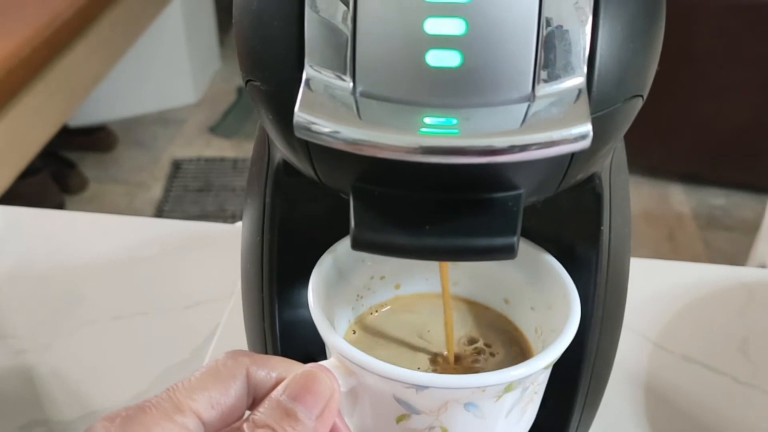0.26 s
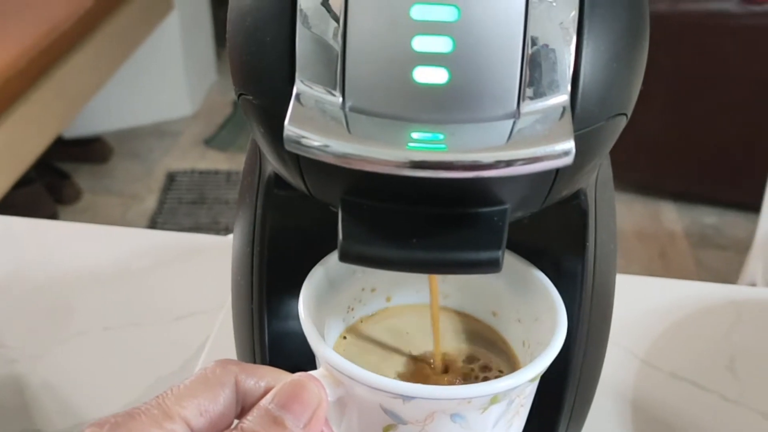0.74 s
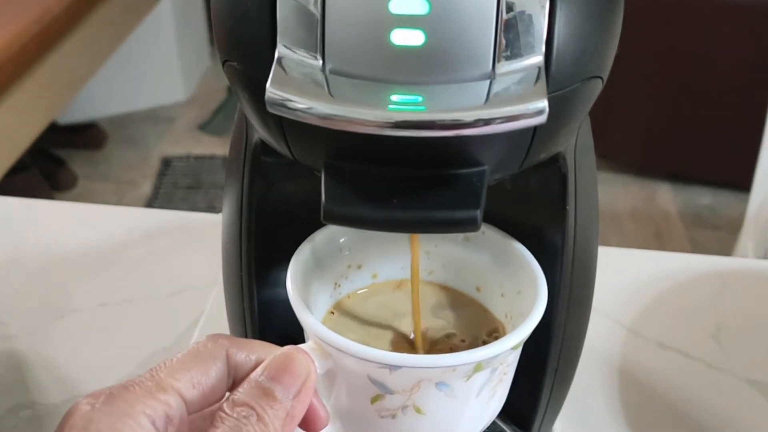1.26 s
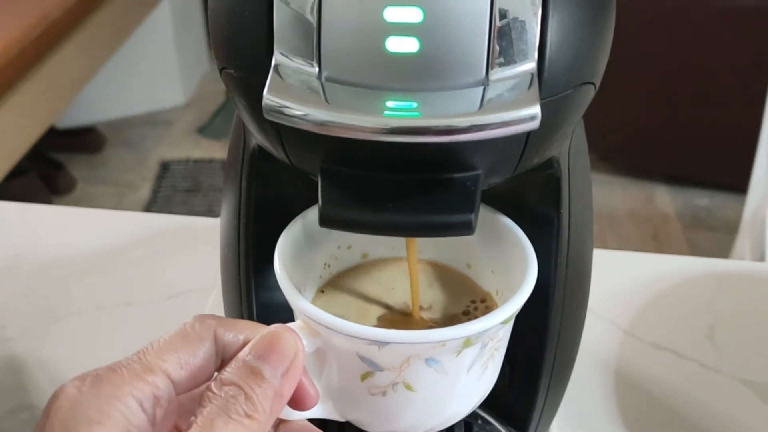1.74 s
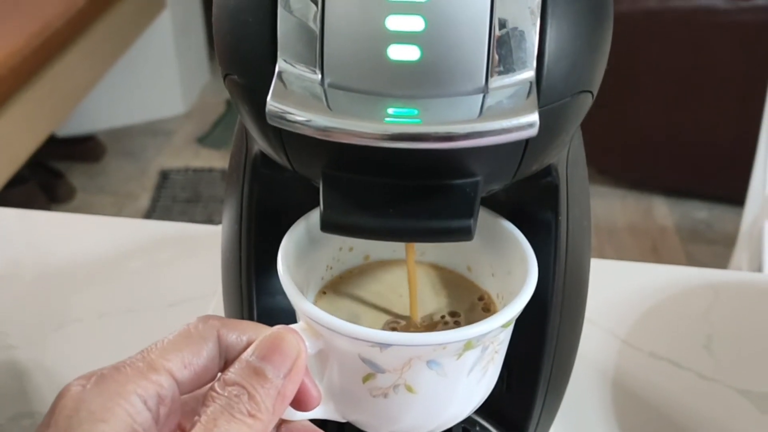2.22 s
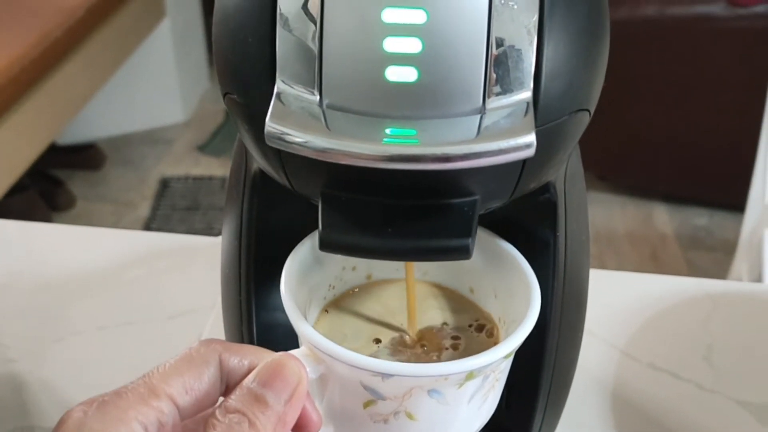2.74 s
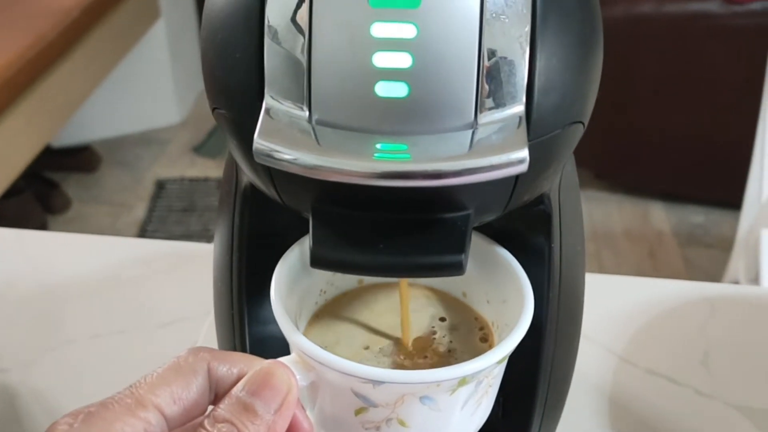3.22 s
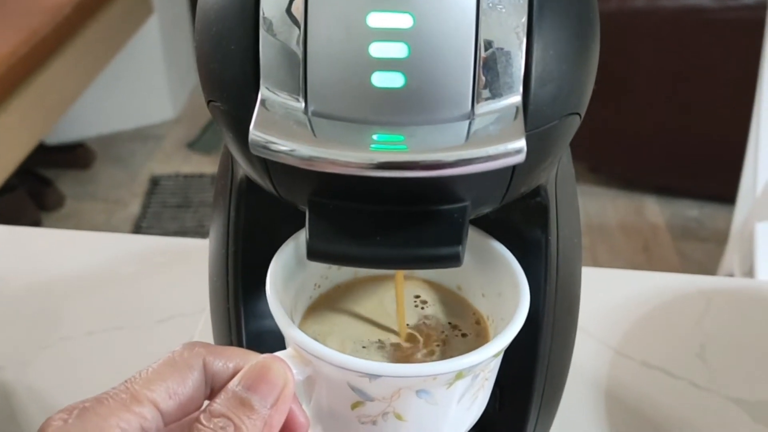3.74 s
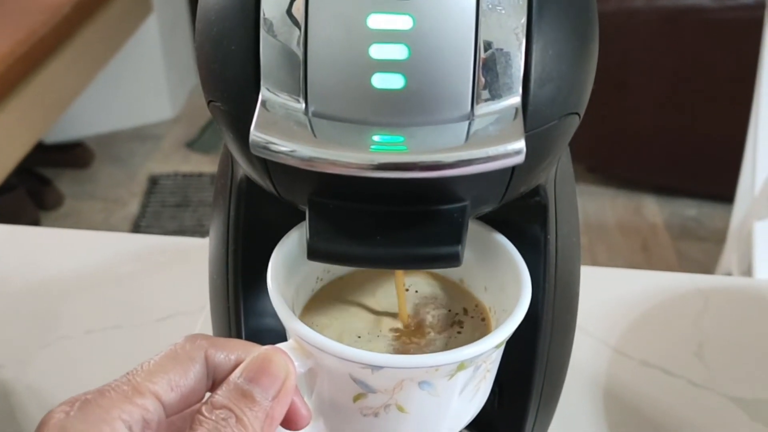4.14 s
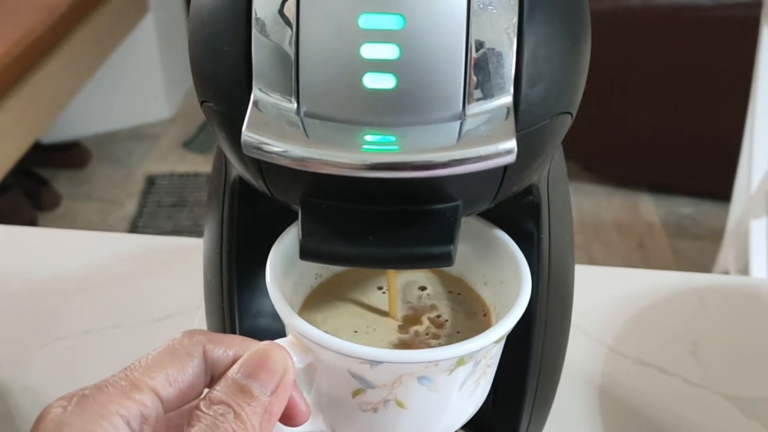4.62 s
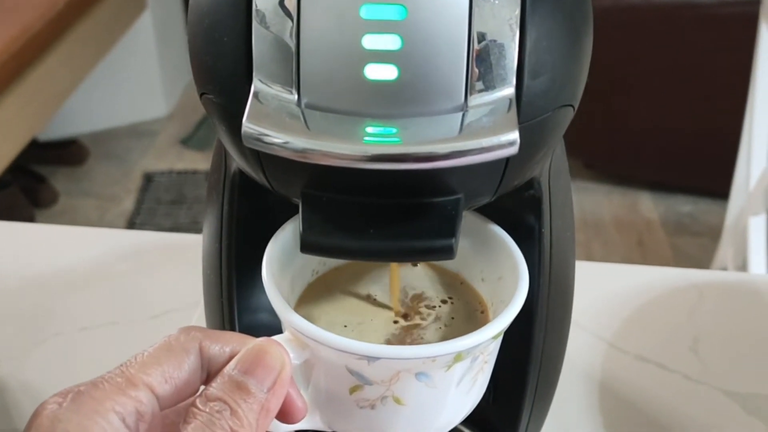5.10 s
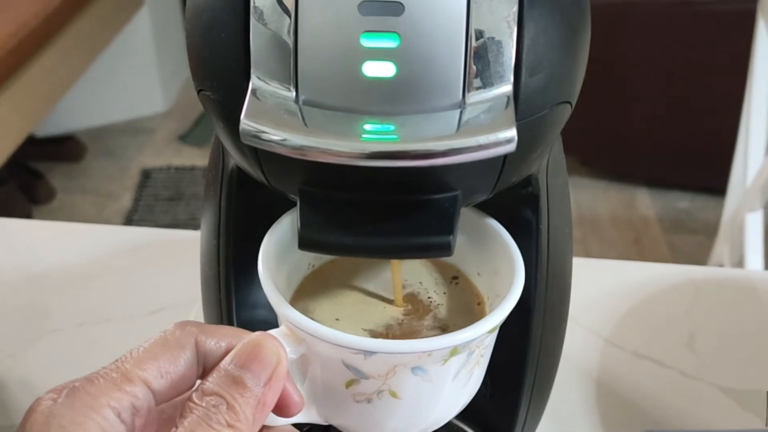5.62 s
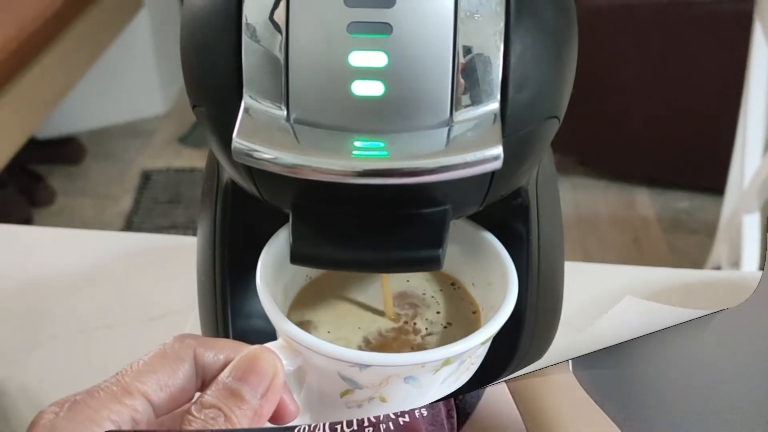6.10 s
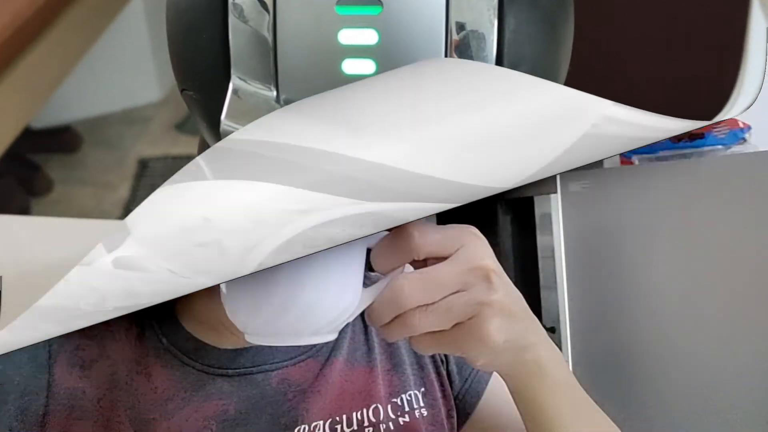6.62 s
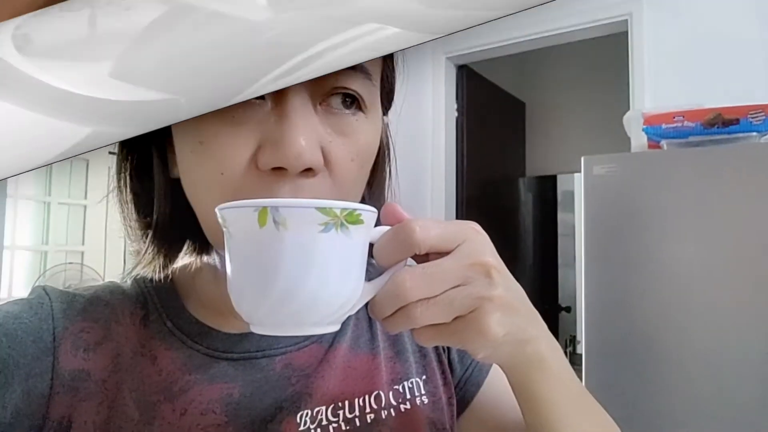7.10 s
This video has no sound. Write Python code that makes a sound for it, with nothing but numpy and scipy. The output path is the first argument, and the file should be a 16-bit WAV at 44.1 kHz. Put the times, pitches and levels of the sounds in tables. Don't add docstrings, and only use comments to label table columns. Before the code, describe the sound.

From 0 s a capsule coffee machine is in full operation on a kitchen counter, heard very close in stereo with little room echo. Its pump beats about sixty times a second, merging into a rough low buzz with a hollow plastic knock and dense midrange rattle from shell and lid. A bright, fine water hiss pulses with each stroke, and small dry valve ticks scatter unevenly throughout, some sharper, around 0.7, 1.3, 3.1, 5.0 and 5.8 s. The drone stays nearly constant, wavering with pressure, with tiny momentary slackenings near 0.3, 0.6, 2.6, 4.9 and 5.3 s. From about 5.95 s it gradually weakens by a modest amount, then stops abruptly at 6.66 s with no ringing tail. Total silence holds until about 7.27 s, when very quiet indoor air with a faint high appliance whine enters and continues to the end.

```python
import sys
import numpy as np
from scipy import signal
from scipy.fft import rfft, irfft
from scipy.io import wavfile

SR = 44100
rng = np.random.default_rng(int(sys.argv[2]) if len(sys.argv) > 2 else 0)


def natural_amplitude(level_db):
    exponent = np.asarray(level_db, float) / 20
    return 10 ** exponent


def dump(signal):
    limited = np.clip(np.atleast_2d(signal).T, -1, 1)
    pcm = np.round(limited * 32767).astype(np.int16)
    wavfile.write(sys.argv[1], SR, pcm)


N = 324135
MAINS_HZ = 60.108
FIRST_SCENE_END_S, KITCHEN_START_S = 6.6622, 7.2663


def level(x, rms_db):
    return x * natural_amplitude(rms_db) / np.sqrt(np.mean(x ** 2))


def noise(colour, lag_ms):
    hz, *columns = np.transpose(colour)
    bins_hz = np.arange(N // 2 + 1) * SR / N
    left_db, right_db, alike = (np.interp(np.log(bins_hz + 1), np.log(hz), c) for c in columns)
    alike = np.clip(alike, 0, 1)
    common, *own = rfft(rng.standard_normal((3, N)))
    late = np.exp(-2j * np.pi * lag_ms * (bins_hz / 1000) ** 1.302)
    shared = np.sqrt(alike) * common * np.array([late ** 0, late])
    separate = np.sqrt(1 - alike) * np.array(own)
    return level(irfft((shared + separate) * natural_amplitude([left_db, right_db]), N), 0)


def samples(times_s):
    return np.clip(times_s * SR, 0, N - 1).astype(int)


def strike(modes, times_s, sizes, colour_db, leads, rise_ms):
    out = np.zeros((2, N))
    at = samples(times_s)
    slow = np.exp(-1000 / (rise_ms * SR))
    for (hz, t60_s, left_db, right_db), lead in zip(modes, leads):
        blows = np.bincount(at, sizes * natural_amplitude(colour_db * rng.standard_normal(len(at))), N)
        spin = np.exp(2j * np.pi * hz / SR)
        poles = [spin * slow, spin * np.exp(-np.log(1000) / (t60_s * SR))]
        ring = signal.lfilter([1 - slow], np.poly(poles), blows + 1e-18)
        turned = np.exp(2j * np.pi * lead) * ring
        out += [natural_amplitude(left_db) * ring.imag, natural_amplitude(right_db) * turned.imag]
    return out


def bump(turns, at, width):
    return np.exp((np.cos(2 * np.pi * (turns - at)) - 1) / width)


def per_stroke(turns, start, spread):
    return spread * rng.standard_normal(int(turns[-1]) + 2)[(turns + 1 - start).astype(int)]


# (frequency [Hz], left [dB/Hz], right [dB/Hz], share common to both ports [0-1])
ROOM_AIR = [(30, -5, -1.5, 0.98), (150, 5.5, 3.5, 1), (400, -1, 0.5, 0.43), (700, -4.5, -6.5, 0.54),
            (1250, -6, -9.5, 0.37), (2000, -12, -8, 0.28), (2800, -9.5, -6, 0.23), (4500, -10, -16.5, .2),
            (7600, -19, -8, .2), (9600, -8.5, -12, .2), (11020, -19.5, -22, .2), (16000, -27, -23, .2)]


def kitchen(t):
    whine = natural_amplitude(-14) * np.sin(2 * np.pi * 7634 * t)
    return natural_amplitude(-46) * (noise(ROOM_AIR, lag_ms=0.03) + whine)


# (frequency [Hz], left [dB/Hz], right [dB/Hz], share common to both ports [0-1])
JET_COLOUR = [(1920, -9.5, -29, 0.31), (2963, 5, -1, 0.17), (3965, -2, -1.5, 0.43), (4800, 5, 4, 0.54),
              (5400, -10.5, 2.5, 0.24), (5740, -0.5, 5.5, 0.32), (7440, -2.5, 3.5, 0.12),
              (9360, -0.5, -3, 0.13), (11000, -11, -9.5, 0.12), (13000, -15.5, -22, .3),
              (14500, -24, -15, .2), (16440, -23, -22.5, .2)]
# (frequency [Hz], t60 [s], left [dB], right [dB])
GRIT_RINGS = [(3786, 0.028, -5, -2.5), (4450, .015, -0.5, 1), (5030, 0.026, -3, -2), (5380, .025, -4.5, 2),
              (5980, 0.019, -1, 2), (6160, 0.018, -4, 0), (6360, .02, -3, -2), (6600, 0.018, -3, 2.5),
              (7430, .015, -4, 2.5), (7850, 0.028, -3.5, -0.5), (8530, 0.011, -3.5, -4.5),
              (9000, .015, 1, -2), (10100, .008, -6.5, -4.5), (14200, .004, -12.5, -9.5)]
VALVE_LEAD_TURNS = [.03, -.38, -.04, .22, -.05, -.12, -.42, .16, -.12, .14, -.3, -.48, -.33, 0]


def jet(turns):
    since = (turns - 0.41) % 1
    puff = (1 - np.exp(-since / 0.033)) * np.exp(-(since / 0.45) ** 2)
    puff_db = 1.5 + per_stroke(turns, 0.33, 3)
    gate = 1 + natural_amplitude(puff_db) * puff
    grains_per_s, grain_spread_db = 2500, 6
    grains = np.flatnonzero(rng.random(N) < grains_per_s / SR)
    sizes = gate[grains] * natural_amplitude(grain_spread_db * rng.standard_normal(len(grains)))
    grit = strike(GRIT_RINGS, grains / SR, sizes, colour_db=2.0, leads=VALVE_LEAD_TURNS, rise_ms=0.1)
    return level(gate * noise(JET_COLOUR, lag_ms=0.1628), -1.3) + level(grit, -5.5)


# (time [s], level [dB], brightness [dB])
HARD_TICKS = [(0.258, -32.5, -11.5), (0.724, -28, -9), (0.789, -30, -7.5), (1.3469, -27, -11),
              (1.654, -33.5, -9), (1.7784, -31, -20), (1.928, -32.5, -14.5), (2.111, -33, -19),
              (2.2114, -31.5, -11), (2.3203, -31, -9), (2.5614, -31, -16), (2.7601, -31, -20),
              (2.8104, -31, -17.5), (2.845, -29.5, -19.5), (3.094, -26.5, -16), (3.2692, -30, -9.5),
              (3.351, -32, -6), (3.7688, -31, -16), (3.8252, -31.5, -20.5), (3.9838, -30.5, -5.5),
              (4.0344, -30.5, -4), (4.101, -29, -18), (4.2906, -32.5, -14.5), (4.9896, -28.5, -17.5),
              (5.0489, -28, -12.5), (5.232, -33.5, -11.5), (5.2979, -30, -7), (5.8065, -26, -16.5),
              (5.8381, -31.5, -17), (5.9783, -29, -7)]
# (frequency [Hz], t60 [s], left [dB], right [dB])
VALVE_RINGS = [(3613, 0.018, -22, -20), (4200, 0.023, -14, -17.5), (5140, 0.053, -20.5, -22),
               (5380, 0.017, -16.5, -17), (5962, 0.0087, -5.5, -4), (6140, 0.006, -9.5, -5.5),
               (6360, 0.011, -11.5, -7.5), (6690, 0.01, -11.5, -3.5), (7260, .01, -17, -10),
               (7860, 0.0051, -17.5, -15.5), (8300, .008, -18, -18), (9000, 0.014, -16.5, -15),
               (10300, 0.0066, -22, -23.5), (14250, 0.0055, -27.5, -22.5)]
# (phase [turns], usual level [dB], scatter [dB], hardest [scatters])
VALVE_SEATS = [
    (-.04, -41, 9.5, 1.3),
    (.49, -37.5, 7.5, 1.11),
    (0.691, -44.5, 3, 0.66),
]
SPRAY_DB = [-12.5, -7.5, -11.5]


def valves(turns, drive_db):
    strokes = np.arange(int(turns[-1]))
    at, seat_db, spread_db, most = np.transpose(VALVE_SEATS)[:, :, None]
    chance = rng.standard_normal((2, len(VALVE_SEATS), len(strokes)))
    times_s = ((strokes + at) / MAINS_HZ + 0.0002 * chance[0]).ravel()
    soft_db = (seat_db + spread_db * np.minimum(chance[1], most)).ravel()
    soft_db += np.interp(times_s * MAINS_HZ, turns, drive_db)

    hard_s, hard_db, bright_db = np.transpose(HARD_TICKS)
    replaced = np.abs(times_s[:, None] - hard_s + 0.001).min(axis=1) < 0.002
    soft_db = soft_db - 20 * (replaced | (times_s < 0))
    soft = strike(VALVE_RINGS, times_s, natural_amplitude(soft_db), colour_db=1.0, leads=VALVE_LEAD_TURNS, rise_ms=0.7)
    hard = strike(VALVE_RINGS, hard_s - 0.0012, natural_amplitude(hard_db + 5.5),
                  colour_db=3.0, leads=VALVE_LEAD_TURNS, rise_ms=1.6)

    starts = samples(np.r_[hard_s - 0.0016, times_s])
    spray_db = np.r_[hard_db + bright_db, soft_db + np.repeat(SPRAY_DB, len(strokes))]
    swell, die = np.exp(-1 / (0.0014 * SR)), np.exp(-1 / (0.0025 * SR))
    spray = signal.lfilter([1 - swell], np.poly([swell, die]), np.bincount(starts, natural_amplitude(spray_db), N))
    hiss = noise(np.add(JET_COLOUR, [0, 0, 0, 0.4]), lag_ms=0.17)
    return soft + hard + natural_amplitude(6.5) * spray * signal.lfilter([1, -0.8], [1], hiss)


# (phase [turns], into shell [dB], into lid [dB], scatter [dB], jitter [ms])
BLOWS = [
    (0.052, 6.5, -6, -2, 0.046),
    (.19, -30.5, 1, -0.5, 0.054),
    (0.289, -38.5, -7.5, -4.5, 0.078),
    (0.428, -17, 2.5, -4, 0.032),
    (0.571, 0.5, -12.5, 1.5, 0.051),
    (.76, -28.5, -1.5, 0.5, 0.051),
    (.87, -19, 1, 3, 0.045),
]
# (frequency [Hz], t60 [s], left [dB], right [dB])
SHELL_RINGS = [(477.8, 0.11, -20.5, -4), (574, 0.056, -24, -25), (604, .11, -11, -8),
               (656.1, 0.23, -3.5, -2.5), (730.3, 0.14, 0, -5.5), (791.5, 0.2, -6, -4.5),
               (847, .12, -0.5, -2.5), (901, 0.11, 1.5, 0), (971.4, 0.085, -2.5, 8.5),
               (1023, 0.19, -5.5, -10), (1089.8, 0.13, 5.5, 4.5), (1175, 0.04, -17.5, -8),
               (1312, 0.23, -9.5, -4.5), (1335, 0.16, -7.5, -9.5)]
# (frequency [Hz], t60 [s], left [dB], right [dB])
LID_RINGS = [(1490, 0.052, -10.5, 4.5), (1620, .03, 1, -9.5), (1774, 0.034, -13, -2),
             (1923, .035, 1, -15.5), (2533, 0.09, -6.5, 0), (2667, 0.028, -15, -5.5), (2760, .025, -13, -9),
             (3027, 0.053, -3, -30.5)]
LID_LEAD_TURNS = [-.3, .48, .3, .08, .01, -.28, -.42, -.28]
# (frequency [Hz], left [dB/Hz], right [dB/Hz], share common to both ports [0-1])
RATTLE_COLOUR = [(400, -21.5, -35, 0.24), (590, -24.5, -23.5, 0.46), (696, 2, -2, 0.94), (956, 2, -5, 0.52),
                 (1190, 0.5, 3, .7), (1610, -3.5, 2, 0.19), (1927, 0, 7, 0.15), (2150, -2.5, -7.5, 0.11),
                 (2560, -4.5, -3, 0.25), (2985, -18.5, -23, 1), (4860, -35, -26, 0.21)]


def housing(turns):
    strokes = np.arange(int(turns[-1]))
    at, shell_db, lid_db, spread_db, jitter_ms = np.transpose(BLOWS)[:, :, None]
    chance = rng.standard_normal((2, len(BLOWS), len(strokes)))
    times_s = ((strokes + at) / MAINS_HZ + jitter_ms * chance[0] / 1000).ravel()
    force_db = spread_db * np.clip(chance[1], -1.2, 1.2)

    shell_lag_turns_per_khz = 0.09
    shell_leads = -shell_lag_turns_per_khz * np.transpose(SHELL_RINGS)[0] / 1000
    shell = strike(SHELL_RINGS, times_s, natural_amplitude(shell_db + force_db).ravel(),
                   colour_db=1.2, leads=shell_leads, rise_ms=0.83)

    lid_play_ms, lid_longest_t60_s = 0.07, 0.03
    loose_s = times_s + lid_play_ms / 1000 * rng.standard_normal(len(times_s))
    lid_modes = [(hz, min(t60_s, lid_longest_t60_s), *dbs) for hz, t60_s, *dbs in LID_RINGS]
    lid = strike(lid_modes, loose_s, natural_amplitude(lid_db + force_db).ravel(),
                 colour_db=2.5, leads=LID_LEAD_TURNS, rise_ms=0.16)

    rest_db, die_s = -3, 0.0016
    shake_sizes = natural_amplitude(np.maximum(shell_db, lid_db) + force_db).ravel()
    shakes = np.bincount(samples(times_s), shake_sizes, N)
    gate = natural_amplitude(rest_db) + signal.lfilter([1], [1, -np.exp(-1 / (die_s * SR))], shakes)
    rattle = gate * natural_amplitude(per_stroke(turns, 0.34, 0.44)) * noise(RATTLE_COLOUR, lag_ms=0.09)
    return level(shell, -7.5) + level(lid, -9.5) + level(rattle, -3.5)


# (frequency [Hz], left [dB/Hz], right [dB/Hz], share common to both ports [0-1])
SHUDDER_COLOUR = [(20, -27, -24.5, 0.4), (100.3, -18.5, -18, 1), (185, -9.5, -10, 1), (257, 8.5, 6, 0.9),
                  (384, -5.5, 1.5, 0.8), (567, -10, -11, 0.4), (820, -39.5, -41, 0.5)]


def thump(turns):
    centre_turns, pitch_hz, glide_hz_per_s, half_length_s, phase_turns = 0.932, 279, 6800, 0.004, -0.05
    start = centre_turns - 0.5
    late_s = ((turns - start) % 1 - 0.5) / MAINS_HZ + per_stroke(turns, start, 0.00004)
    hz = pitch_hz * (1 + per_stroke(turns, start, 0.016))
    swing = np.exp(-(late_s / half_length_s) ** 2) * natural_amplitude(per_stroke(turns, start, 0.52))
    wave_turns = hz * late_s + glide_hz_per_s * late_s ** 2 / 2 + phase_turns
    wave = swing * -np.cos(2 * np.pi * wave_turns)

    hum = natural_amplitude(-20.5) * np.cos(2 * np.pi * (2 * turns - 0.04))
    hum += natural_amplitude(-56) * np.cos(2 * np.pi * (3 * turns - 0.4))
    hum += natural_amplitude(-18.5) * np.cos(2 * np.pi * (5 * turns - 0.19))
    hum += natural_amplitude(-51.5) * np.cos(2 * np.pi * (7 * turns - 0.33))
    shudder = (natural_amplitude(19.5) + bump(turns, 0.9, 0.35)) * noise(SHUDDER_COLOUR, lag_ms=0.02)
    return level(wave, -0.4) + hum + level(shudder, -12.0)


# (time [s], level [dB])
BACK_PRESSURE = [(0, -3), (.2, 0.5), (.6, -1.5), (1.2, -0.8), (1.9, -1), (2.25, 0.1), (2.9, 0.2),
                 (3.6, -0.6), (4.1, -0.1), (4.6, -1), (5.1, 0.3), (5.5, -0.26), (5.9, -0.46), (6.66, -0.3)]
# (time [s], change [dB])
SLACK_STROKES = [
    (.33, -3.5),
    (0.589, -2.5),
    (1.52, -1),
    (2.275, 1),
    (2.54, -1.5),
    (2.625, -3.5),
    (4.866, -4),
    (5.274, -3.5),
]


def pressure_db(t):
    slack_s = 0.017
    slack_db = sum(db * np.exp(-((t - s) / slack_s) ** 2) for s, db in SLACK_STROKES)
    return np.interp(t, *np.transpose(BACK_PRESSURE)) + slack_db


def shot(t):
    fade_s, fade_db, edge_s = 5.95, -5, 0.0022
    fade = natural_amplitude(fade_db * np.clip((t - fade_s) / (FIRST_SCENE_END_S - fade_s), 0, 1))
    return fade * np.clip((FIRST_SCENE_END_S - t) / edge_s, 0, 1)


def scene():
    t = np.arange(N) / SR
    turns = MAINS_HZ * t
    drive_db = pressure_db(t)
    settle_db = 2 * np.exp(-t / 0.61)
    brew = natural_amplitude(-32 + 0.2 * drive_db) * thump(turns)
    brew += natural_amplitude(-35.5 + 0.79 * drive_db + settle_db) * housing(turns)
    brew += natural_amplitude(-44.5 + drive_db) * jet(turns)
    brew += valves(turns, 2.7 * drive_db)
    return brew * shot(t) + kitchen(t) * (t > KITCHEN_START_S)


def band_limit(x):
    return signal.sosfilt(signal.butter(12, 15800, fs=SR, output="sos"), x)


def record(dry):
    t = np.arange(N) / SR
    offset = 0.0027 * shot(t) + 0.00924 * (t > KITCHEN_START_S)
    return band_limit(dry + offset)


dry = scene()
out = record(dry)
dump(out)
```